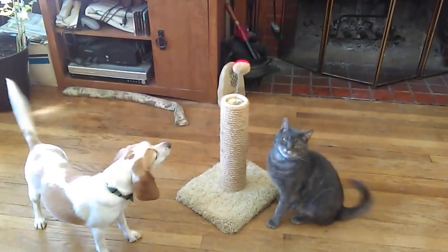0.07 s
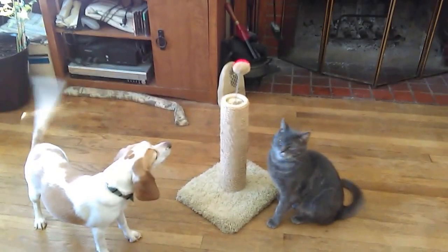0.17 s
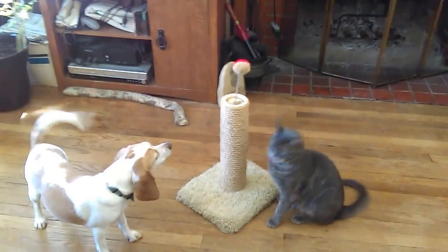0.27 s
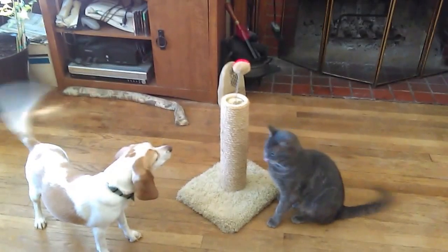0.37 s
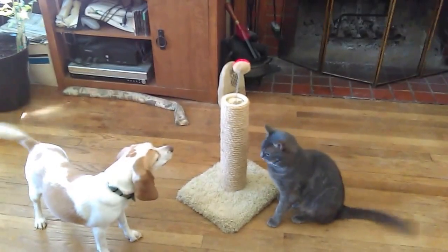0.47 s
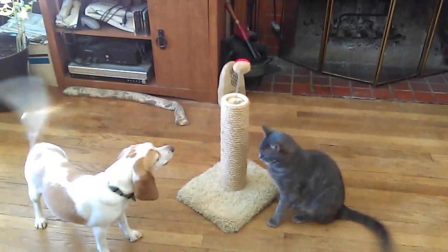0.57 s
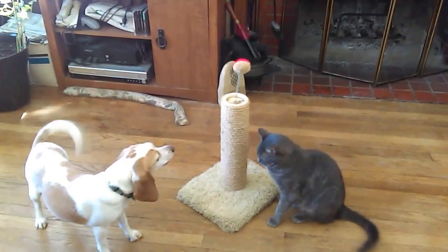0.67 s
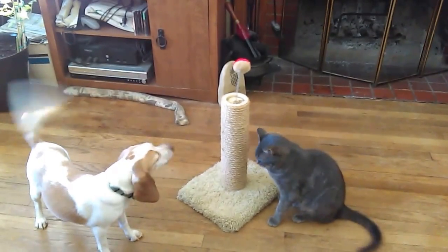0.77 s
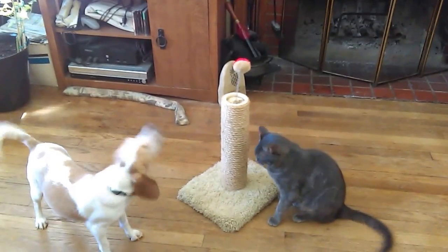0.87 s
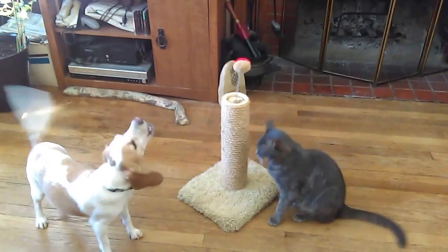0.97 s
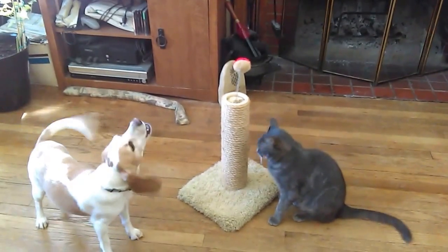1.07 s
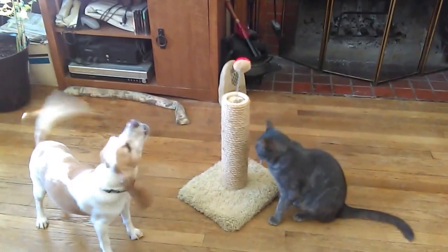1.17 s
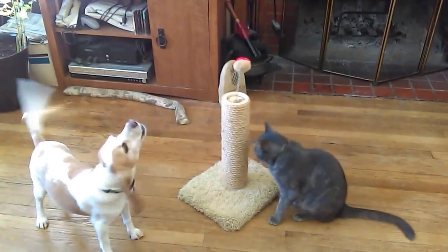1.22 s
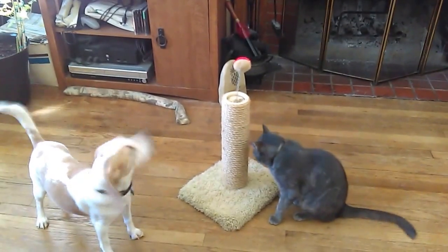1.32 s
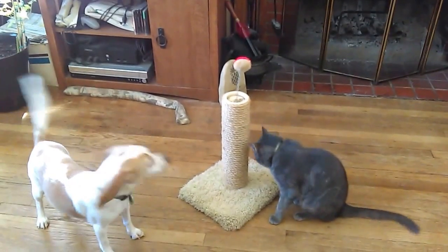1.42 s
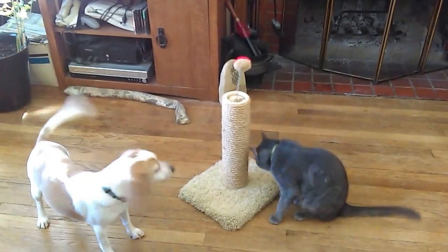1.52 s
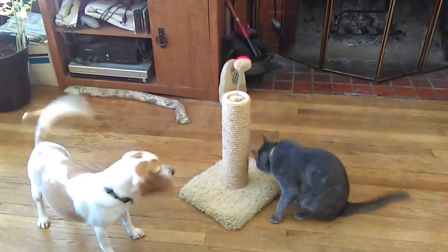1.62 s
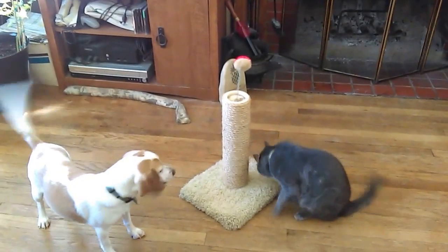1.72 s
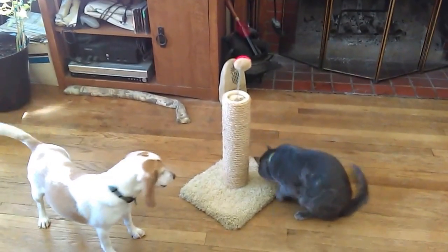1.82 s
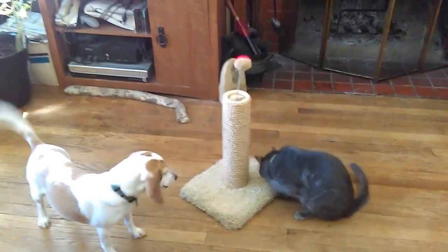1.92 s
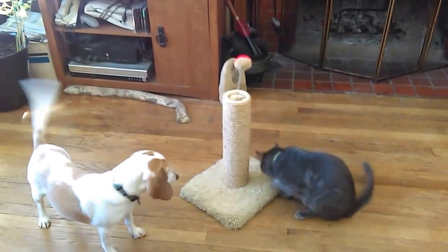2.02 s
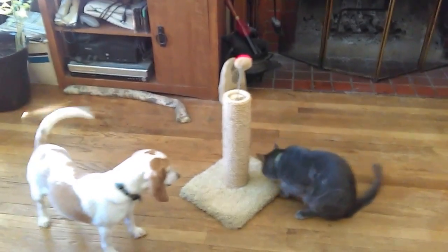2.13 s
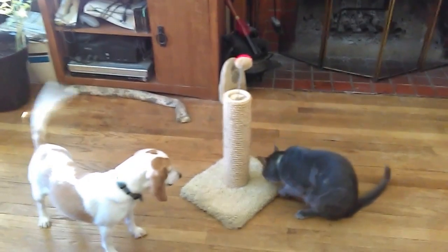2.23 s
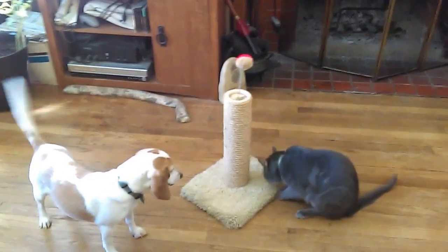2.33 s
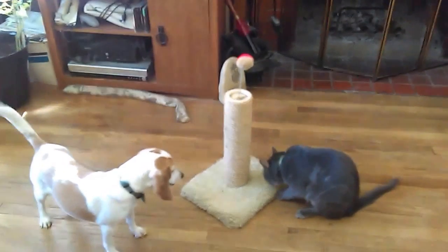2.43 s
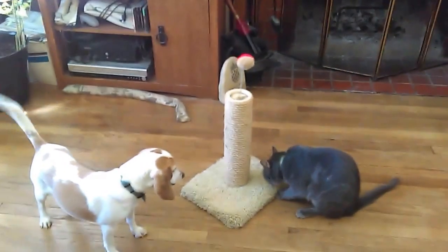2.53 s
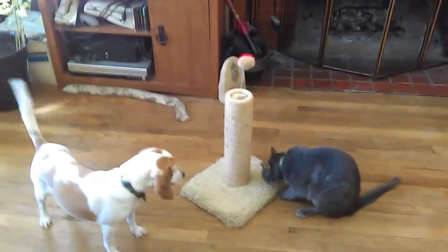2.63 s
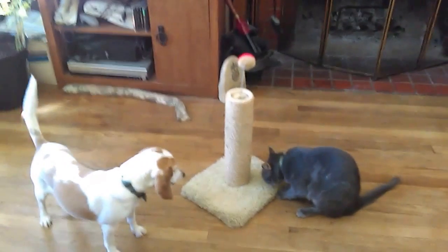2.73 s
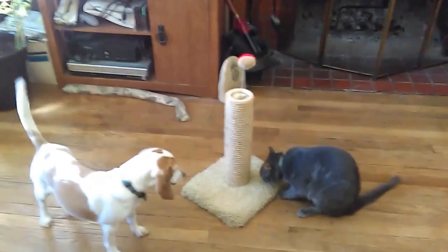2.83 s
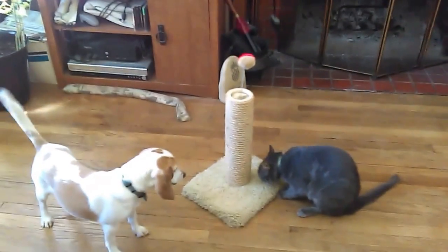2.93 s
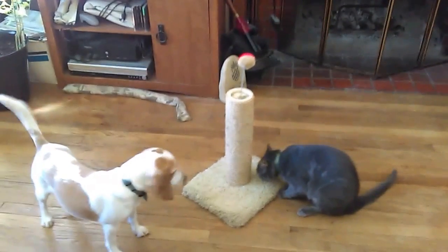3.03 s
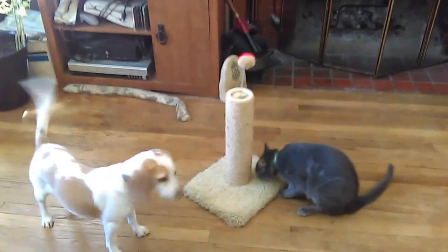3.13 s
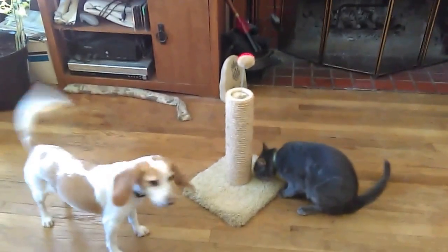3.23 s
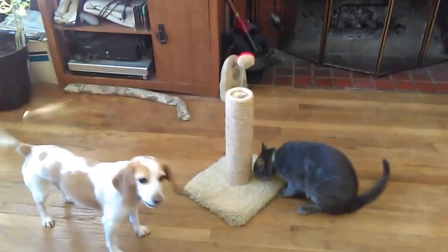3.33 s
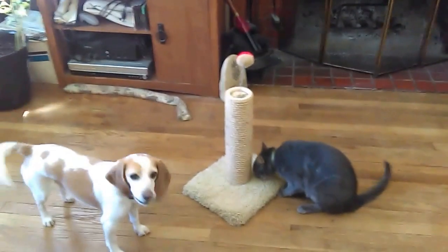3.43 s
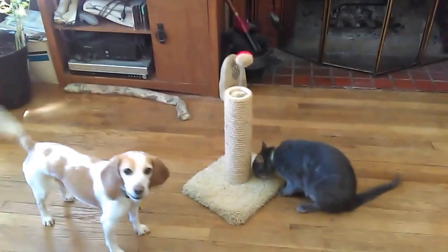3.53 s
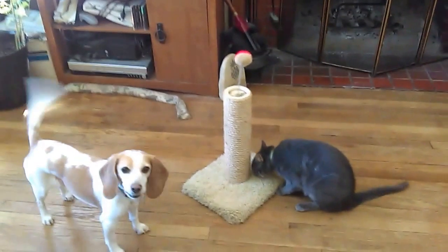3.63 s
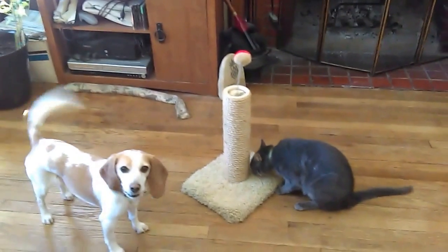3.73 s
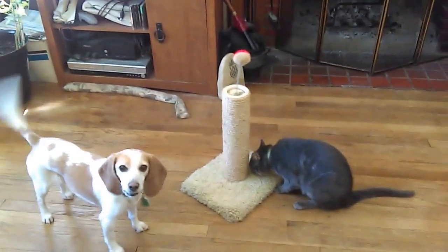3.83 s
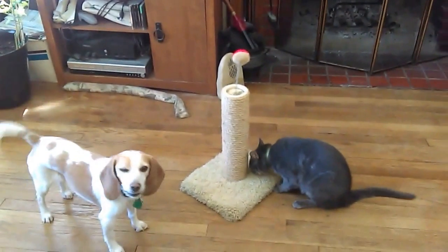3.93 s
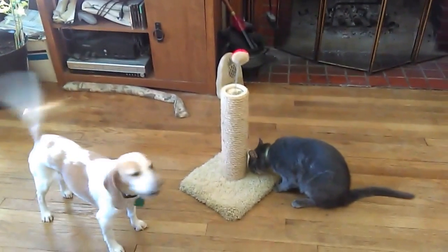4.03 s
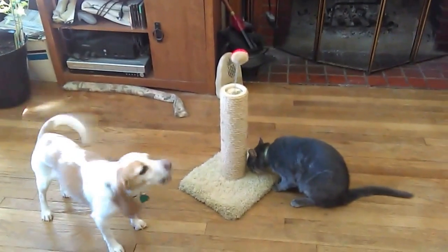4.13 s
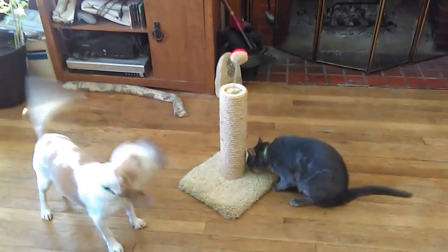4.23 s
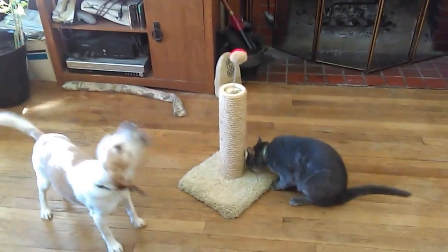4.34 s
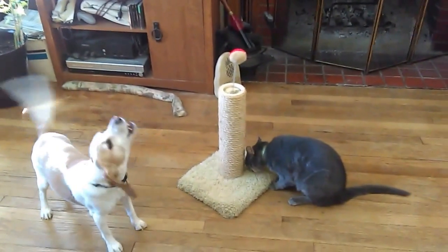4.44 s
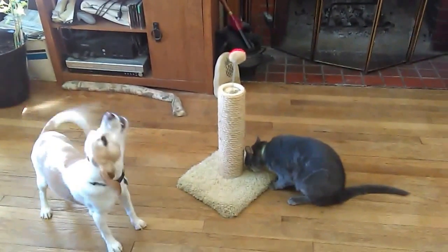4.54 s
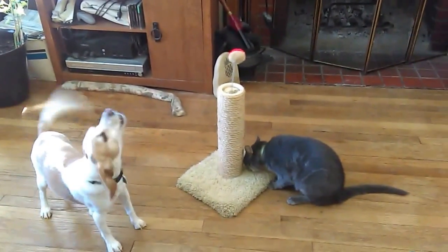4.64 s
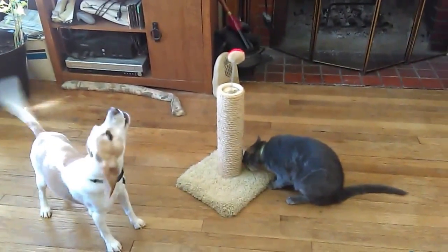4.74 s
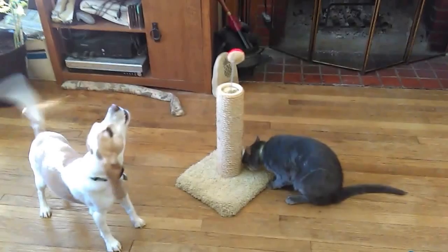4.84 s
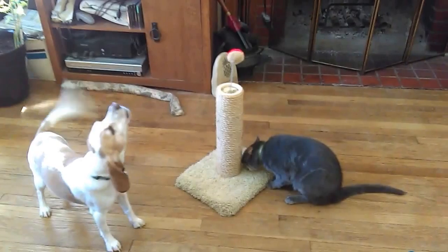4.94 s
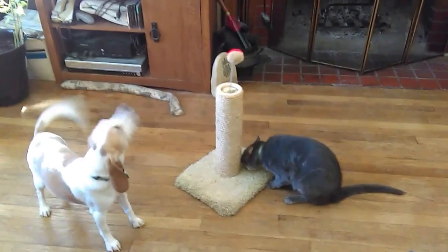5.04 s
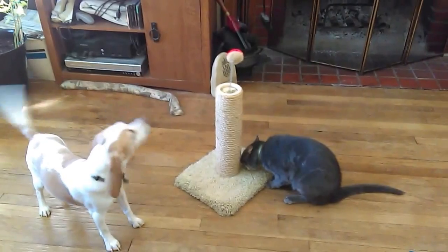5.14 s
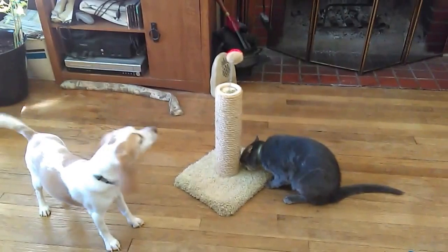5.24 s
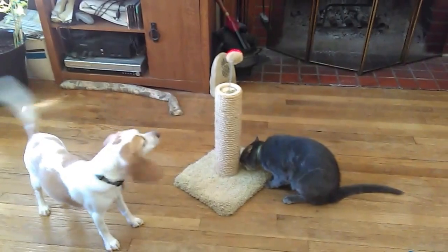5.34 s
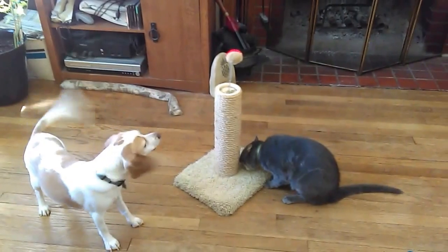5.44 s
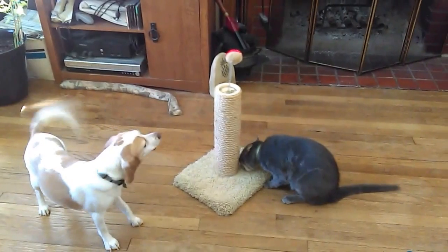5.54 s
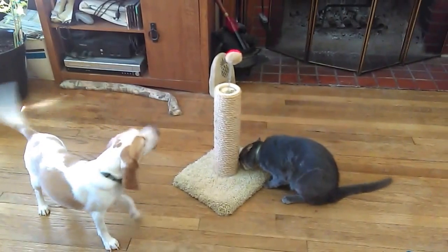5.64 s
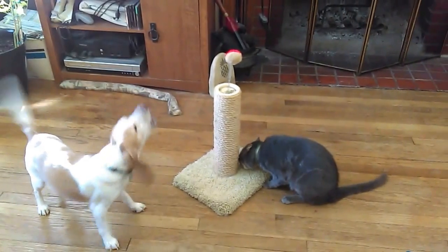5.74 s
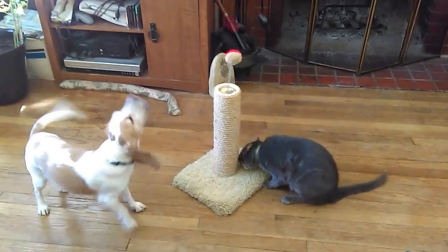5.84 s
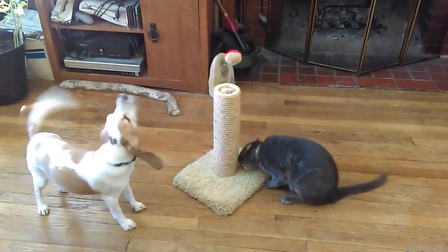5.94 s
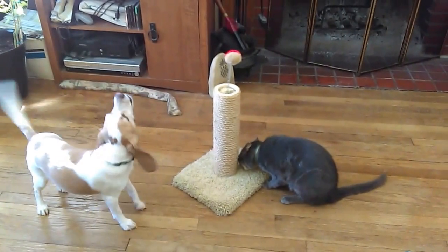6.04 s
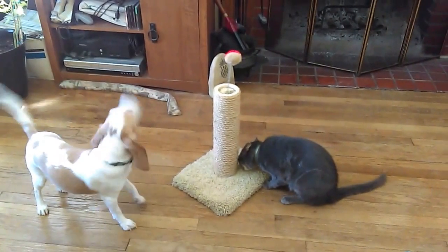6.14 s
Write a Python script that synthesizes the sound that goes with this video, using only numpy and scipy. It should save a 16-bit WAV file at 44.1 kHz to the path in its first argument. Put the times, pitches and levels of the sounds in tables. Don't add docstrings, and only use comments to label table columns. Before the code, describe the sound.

Indoors, a hound a few steps from a small stereo microphone bays three times, very loud and slightly overloaded. Each call starts with a raspy break and settles into an almost pure, nasal tone with short room ring. The first two droop in pitch; the last stays strong and stops abruptly. Between the first and second, only light steps on boards, tiny sniffs and soft hiss.

```python
import sys
import numpy as np
from scipy import signal
from scipy.fft import rfft, irfft
from scipy.io import wavfile
from scipy.ndimage import uniform_filter1d, minimum_filter1d

SR = 44100
rng = np.random.default_rng(int(sys.argv[2]) if len(sys.argv) > 2 else 0)


def volts_from_decibels(level):
    exponent = np.asarray(level, float) / 20
    return 10 ** exponent


def log_audio(samples):
    frames = np.atleast_2d(samples).T
    limited = np.clip(frames, -1, 1)
    pcm = np.round(limited * 32767).astype(np.int16)
    wavfile.write(sys.argv[1], SR, pcm)


N = 272538

# time_s, pitch_hz, effort_db, jaw_opening_db
CALLS = [
    [(.828, 668.5, -56.5, 21), (.85, 689.8, -27.5, 20), (.874, 768.8, -2.5, 3.5), (.945, 723.1, -8, -3.5),
     (1.05, 671.1, -10.5, -7), (1.138, 609.7, -15.5, -5.5), (1.26, 541.4, -20.5, -8.5),
     (1.335, 339.2, -36.5, -4.5), (1.375, 319, -45, -4)],
    [(4.226, 725.3, -53, 14.5), (4.247, 761.2, -9, 9.5), (4.325, 753.4, -5.5, -4.5),
     (4.47, 585.8, -17.5, -2.5), (4.685, 583.2, -19, -7.5), (4.77, 628.4, -21, -4), (4.89, 573.1, -18, -12),
     (5.125, 355.9, -32, -10.5), (5.195, 349.6, -49.5, -39)],
    [(5.68, 603, -49.5, -5), (5.7, 616.8, -36.5, 24.5), (5.735, 705, -7, 7), (5.82, 708.7, -10.5, -3.5),
     (5.9, 628.7, -6, -13), (6.05, 616.3, -7, -12), (6.11, 662.6, -14.5, -6), (6.14, 622.2, -17.5, -4.5),
     (6.18, 494.3, -18, 0)],
]
CALL_S = 1.15
SHUT_DB_PER_S = 610
SCOOP, SCOOP_S = .42, .035
# start_s, hold_s, fall_s, jump_hz, extra_effort_db
FLIPS = [
    (1.138, .085, .035, 171.6, 3.5),
    (4.544, 0.042, .09, 147, 4),
]
FLIP_RISE_S, FLIP_GAPE_DB = .015, 2
# middle_s, length_s, roughness (0-1), half_pitch_share (0-1)
BREAKS = [
    (0.964, .07, .45, .4),
    (1.083, .16, .14, 0),
    (4.36, .09, .45, .3),
    (4.45, .09, 0.2, .1),
    (4.621, .14, .1, 0),
    (5.781, 0.15, .1, 0.28),
    (5.88, .06, .04, 0),
]
# middle_s, length_s, level_db
DIPS = [(.915, .03, -14), (0.958, .025, -8), (1.175, .07, -2), (4.37, .06, -6.5), (4.5, .06, -7),
        (4.702, 0.09, -5.5), (4.856, 0.083, -19), (4.953, .07, -15.5), (5.767, .04, -12),
        (5.824, 0.034, -7), (6.079, 0.045, -1), (6.145, 0.024, -7)]
CALM_ROUGH, STRAIN_ROUGH, STRAIN_S = .006, .08, .12
CALM_HALF, STRAIN_HALF = .015, .15
FAINT_DB, FAINT_SPAN_DB, FAINT_ROUGH = -37, 25.5, 0.21
RASP_DB, RASP_FOLLOW, RASP_JAW = -0.5, 1, .3
# freq_hz, level_db
THROAT = [(150, -3.5), (330, 1.5), (650, 2), (950, -3), (1350, -9.5), (1700, -24), (2600, -31),
          (3500, -44.5), (4100, -53.5), (6500, -52), (9000, -51), (11000, -52), (13000, -65.5),
          (15500, -76)]
# freq_hz, width_hz, level_db, gain per dB of open mouth (db)
MUZZLE = [(2013, 240, 7, 0.81), (2550, 390, 8, .5), (3000, 240, 15, -0.42), (3480, 400, 2, 1.19),
          (4570, 250, 12.5, 0.84), (5790, 95, 14.5, -0.3), (7104, 510, 15, 0), (7780, 310, 10.5, -0.5),
          (8380, 240, 18, 0.5), (9518, 370, 16.5, 0), (9970, 190, 17.5, -0.5), (10680, 200, 11.5, 0.5),
          (12100, 900, 13.5, -0.03), (14900, 400, 15.5, -1.5)]
# start_s, length_s, pitch_hz, level_db
TEARS = [
    (.945, 0.06, 810, -11.5),
    (.94, 0.069, 1060, -22),
    (4.322, .05, 815, -9.5),
    (4.33, 0.044, 1075, -18),
    (5.725, 0.041, 1300, -20),
]
# left_minus_right_db, left_port_lag (samples)
HEAD = [
    (-2, 7),
    (-2.5, -5),
    (-2, -5.5),
]
# freq_hz, left_minus_right_db
PORTS = [(300, 2.5), (700, 3.5), (1500, -5.5), (3000, -7.5), (5500, -13.5), (9000, -3), (13000, 1.5)]
# middle_s, length_s, level_db
THUMPS = [
    (0.898, .13, -48),
    (4.29, .12, -48),
    (5.757, .14, -49),
]
# start_s, level_db, brightness_hz, length_s
STEPS = [
    (1.889, -44.5, 3000, 0.022),
    (1.946, -57, 4990, 0.011),
    (2.569, -45, 12000, 0.018),
    (2.692, -70.5, 7000, .02),
    (2.933, -66, 7950, 0.021),
    (3.164, -66, 8070, 0.091),
    (3.988, -45, 2480, 0.018),
]
# start_s, length_s, level_db
SNIFFS = [
    (2.1, 0.57, -73.5),
    (2.5, 0.38, -72),
    (2.85, 0.44, -78.5),
    (3.52, 0.37, -69),
    (4.11, 0.085, -57.5),
]
# freq_hz, width_hz, level_db
NOSE = [(650, 70, 4), (1048.4, 360, -6), (1470, 180, 0), (2410, 200, 4.5), (3000, 1100, -8.5)]
# freq_hz, t60_s
ROOM = [(250, .36), (700, 0.38), (1800, 0.41), (3000, 0.31), (5000, 0.61), (10000, .22)]
# delay_s, level_db
WALLS = [(.0021, -7), (.0058, 4), (.0093, -8.5), (.0137, -11.5), (.019, 3.5)]
ROOM_DB = 3
# freq_hz, level_db (per Hz)
HUSH = [(15, -12), (30, -9.5), (60, 6.5), (130, -4.5), (240, -1), (330, -7), (600, -11.5), (1200, -18),
        (3000, -24.5), (7000, -26), (12000, -27), (16000, -32)]
# freq_hz, likeness (-1 to 1)
HUSH_SAME = [(60, -0.19), (160, 1), (410, -0.37), (1000, -0.34), (3000, -0.67), (10000, 0.64)]
# freq_hz, left_minus_right_db
HUSH_SIDE = [(60, 0.5), (160, 0.5), (410, -4), (1000, -5.5), (3000, -16), (10000, -6)]
HUSH_DB = -64


def controls(call):
    at, hz, db, jaw_db = np.transpose(call)
    age = np.arange(0, CALL_S, 1 / 1000)
    s = at[0] + age
    flips = []
    for start, hold, fall, _, _ in FLIPS:
        corners = [0, FLIP_RISE_S, FLIP_RISE_S + hold, FLIP_RISE_S + hold + fall]
        flips.append(np.interp(s - start, corners, [0, 1, 1, 0]))
    pitch = np.interp(s, at, hz) * (1 - SCOOP * np.exp(-age / SCOOP_S))
    effort = np.interp(s, at, db)
    for flip, (_, _, _, jump_hz, extra_db) in zip(flips, FLIPS):
        pitch = pitch + flip * jump_hz
        effort = effort + flip * extra_db
    effort = np.maximum(effort - SHUT_DB_PER_S * np.maximum(s - at[-1], 0), -120)
    faint = np.clip((FAINT_DB - effort) / FAINT_SPAN_DB, 0, 1)
    strain = np.exp(-age / STRAIN_S)
    rough = CALM_ROUGH + STRAIN_ROUGH * strain + FAINT_ROUGH * faint
    half = CALM_HALF + STRAIN_HALF * strain + faint
    for middle, length, break_rough, break_half in BREAKS:
        swell = bump(s, middle, length)
        rough = rough + break_rough * swell
        half = half + break_half * swell
    jaw = np.interp(s, at, jaw_db) + FLIP_GAPE_DB * sum(flips)
    chest = effort + sum(db * bump(s, middle, length) for middle, length, db in DIPS)
    rasp = RASP_DB + RASP_FOLLOW * effort + RASP_JAW * jaw
    return np.transpose([s, chest, pitch, rough, half, effort + jaw, rasp])


def bay(rows):
    s, *columns = np.transpose(rows)
    t = s[0] + np.arange(0, CALL_S, 1 / SR)
    chest_db, hz, rough, half, mouth_db, rasp_db = (np.interp(t, s, c) for c in columns)
    rough, half = np.clip(rough, 0, 1), np.clip(half, 0, 1)
    hz = uniform_filter1d(hz, size=300) * (1 + (0.0049 + 0.06 * rough) * wobble(len(t), hz=46.0))
    slip = np.cumsum((.006 + .35 * rough) * hz * wobble(len(t), hz=260)) / SR
    turns = np.cumsum(hz) / SR
    flutter = (0.28 + 2.1 * rough) * wobble(len(t), hz=37.04)
    voice = np.zeros(len(t))
    for k in list(range(2, 90, 2)) + list(range(1, 24, 2)):
        share = half if k % 2 else 1
        if k == 1:
            share = half * volts_from_decibels(-.14 * (hz - 345))
        angle = np.pi * (k * turns + max(k - 2, 0) * slip) + 7.4 * rng.random()
        share = share * (1 + flutter * 2 / max(k, 2))
        voice += share * volts_from_decibels(throat_db(hz * k / 2, chest_db, mouth_db, rasp_db)) * np.cos(angle)
    puffing = rng.standard_normal(len(t)) * (1 + 0.62 * np.cos(2 * np.pi * turns))
    f, frame_s, z = signal.stft(puffing, SR, nperseg=512)
    drives_db = (np.interp(frame_s + s[0], s, columns[c]) for c in [0, 4, 5])
    z *= volts_from_decibels(throat_db(f[:, None], *drives_db))
    z *= 1 / (1 + (750 / (f[:, None] + 1)) ** 8)
    breath = signal.istft(z, SR, nperseg=512)[1][:len(t)]
    return volts_from_decibels(1.5) * muzzle(voice + 8 * rough * breath, mouth_db)


def throat_db(hz, chest_db, mouth_db, rasp_db):
    above_first = np.clip((hz - 850) / 700, 0, 1)
    above_mouth = np.clip((hz - 3700) / 800, 0, 1)
    drive_db = chest_db + (mouth_db - chest_db) * above_first + (rasp_db - mouth_db) * above_mouth
    return read(THROAT, hz) + drive_db


def muzzle(x, mouth_db):
    f, frame_s, z = signal.stft(x, SR, nperseg=512, noverlap=384)
    at = np.minimum(np.arange(len(frame_s)) * 128, len(x) - 1)
    jaw_db = np.clip(mouth_db[at] + 15.5, -12, 10)
    for hz, width, db, per_db in MUZZLE:
        swell = 1 + .38 * np.clip(wobble(len(x), hz=4)[at], -2, 1)
        peak_db = db * swell + per_db * jaw_db
        hz = hz * (1 + .007 * wobble(len(x), hz=3)[at])
        z = z * volts_from_decibels(peak_db / (1 + (2 * (f[:, None] - hz) / width) ** 2))
    return signal.istft(z, SR, nperseg=512, noverlap=384)[1][:len(x)]


def tears():
    out = np.zeros(N)
    for s, length, hz, db in TEARS:
        size = round(length * SR)
        waver = wobble(SR // 10, hz=89.56)[:size]
        turns = np.cumsum(hz * (1 + .05 * waver)) / SR
        add(out, s, volts_from_decibels(db + 2) * np.hanning(size) * np.cos(2 * np.pi * turns))
    return out


def heard(sound, pan_db, lag):
    sound = np.pad(sound, (40, 400))

    def port(side):
        return coloured(sound, lambda f: volts_from_decibels(side * (pan_db + read(PORTS, f)) / 2)
                        * np.exp(-1j * np.pi * f * side * lag / SR))

    return np.array([port(1), port(-1)])


def thumps():
    t = np.arange(N) / SR
    low = evened(coloured(rng.standard_normal((2, N)), lambda f: 1 / (1 + (f / 220) ** 2)))
    return low * volts_from_decibels([[-3], [2]]) * sum(volts_from_decibels(db) * bump(t, s, length) for s, length, db in THUMPS)


def steps():
    out, t = np.zeros(N), np.arange(6000) / SR
    for s, db, top_hz, length in STEPS:
        burst = rng.standard_normal(len(t)) * np.exp(-t / length) * np.minimum(t / 0.00091, 1)
        add(out, s, volts_from_decibels(db) * coloured(burst, lambda f: 2 / np.sqrt(1 + f / 300) / (1 + (f / top_hz) ** 2)))
    return out


def sniffing():
    def nose(f):
        return sum(volts_from_decibels(db) / (1 + (2 * (f - hz) / width) ** 2) for hz, width, db in NOSE)

    air, t = evened(coloured(rng.standard_normal(N), nose)), np.arange(N) / SR
    puffs = sum(volts_from_decibels(db) * bump(t, s + length / 2, length) ** 0.21 for s, length, db in SNIFFS)
    return air * (puffs + volts_from_decibels(-87.5)) * volts_from_decibels(4.6 * wobble(N, hz=8.1))


def room():
    taps = np.zeros((2, SR))
    at = np.arange(400, SR - 20, 20) + rng.integers(0, 20, (2, (SR - 401) // 20))
    np.put_along_axis(taps, at, rng.choice([-1., 1.], at.shape), 1)
    hz, t, z = signal.stft(taps, SR, nperseg=256)
    same = .93 / (1 + (hz[:, None] / 1600) ** 2)
    z[1] = same * z[0] + np.sqrt(1 - same ** 2) * z[1]
    decay = volts_from_decibels(-60 * t / read(ROOM, hz)[:, None])
    tail = signal.istft(z * decay, SR, nperseg=256)[1]
    tail *= volts_from_decibels(ROOM_DB) / np.linalg.norm(tail[0])
    tail[:, 0] = 1
    for k, (s, db) in enumerate(WALLS):
        tail[[0, 1], round(s * SR) + np.array([0, 9 * (-1) ** k])] += volts_from_decibels(db)
    return tail / np.linalg.norm(tail[0])


def hush():
    a, b = rfft(rng.standard_normal((2, N)))
    hz = np.fft.rfftfreq(N, 1 / SR)
    same = np.clip(read(HUSH_SAME, hz), -1, 1)
    z = np.array([a, same * a + np.sqrt(1 - same ** 2) * b])
    z *= volts_from_decibels(read(HUSH, hz) + np.array([[.5], [-.5]]) * read(HUSH_SIDE, hz))
    x = irfft(z, N)
    return volts_from_decibels(HUSH_DB) * x / np.std(x.mean(0))


def evened(x):
    return x / np.sqrt(np.mean(x ** 2) + 1e-20)


def read(points, hz):
    f, value = np.transpose(points)
    return np.interp(np.log(hz + 1), np.log(f + 1), value)


def add(mix, s, sound):
    part = mix[..., round(s * SR):][..., :sound.shape[-1]]
    part += sound[..., :part.shape[-1]]


def coloured(x, gain):
    return irfft(rfft(x) * gain(np.fft.rfftfreq(x.shape[-1], 1 / SR)), x.shape[-1])


def wobble(size, hz):
    return evened(coloured(rng.standard_normal(size), lambda f: 1 / (1 + (f / hz) ** 4)))


def bump(s, middle, length):
    return np.cos(np.pi * np.clip((s - middle) / length, -.5, .5)) ** 2


def scene():
    near = np.array([1, 1])[:, None] * (steps() + sniffing() + tears())
    for call, head in zip(CALLS, HEAD):
        add(near, call[0][0] - 40 / SR, heard(bay(controls(call)), *head))
    return signal.fftconvolve(near, room(), axes=1)[:, :N] + hush() + thumps()


def band_limit(x):
    return signal.sosfilt(signal.butter(12, 15730, fs=SR, output="sos"), x)


def record(dry):
    limit = np.minimum(.88 / (abs(dry).max(0) + 1e-9), 1)
    held = dry * uniform_filter1d(minimum_filter1d(limit, size=400), size=300)
    rounded = held / (1 + (held / 1.3) ** 4) ** .25
    return band_limit(rounded)


dry = scene()
out = record(dry)
log_audio(out)
```